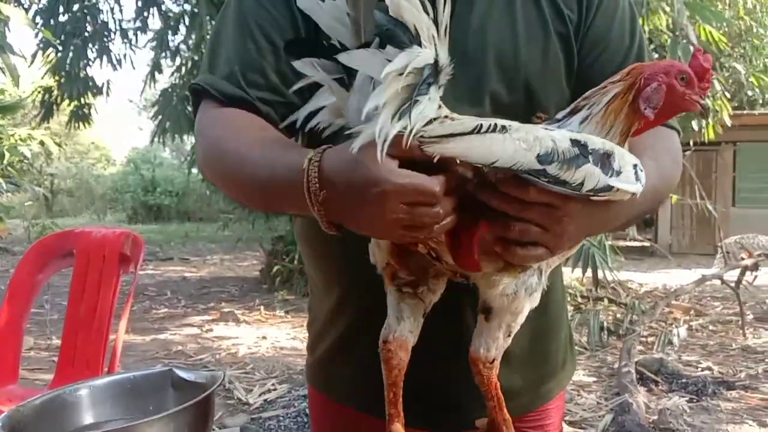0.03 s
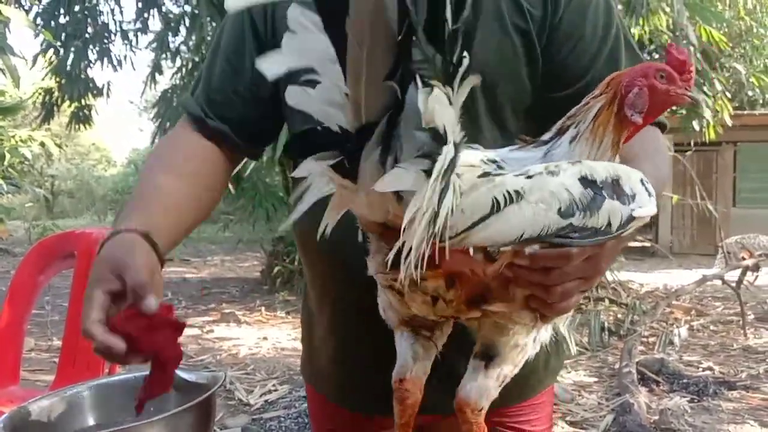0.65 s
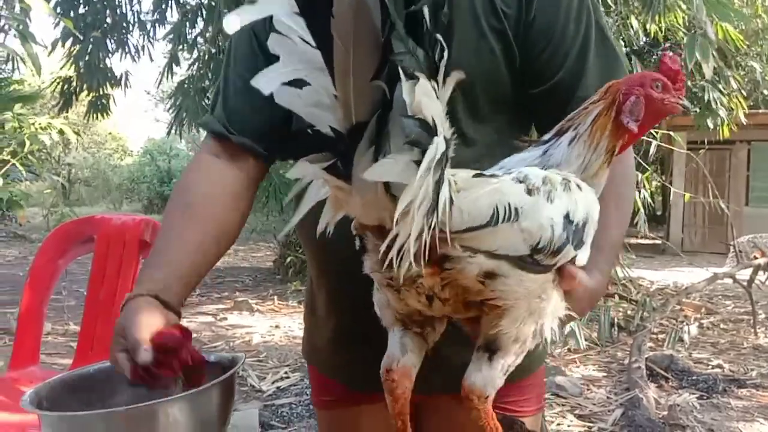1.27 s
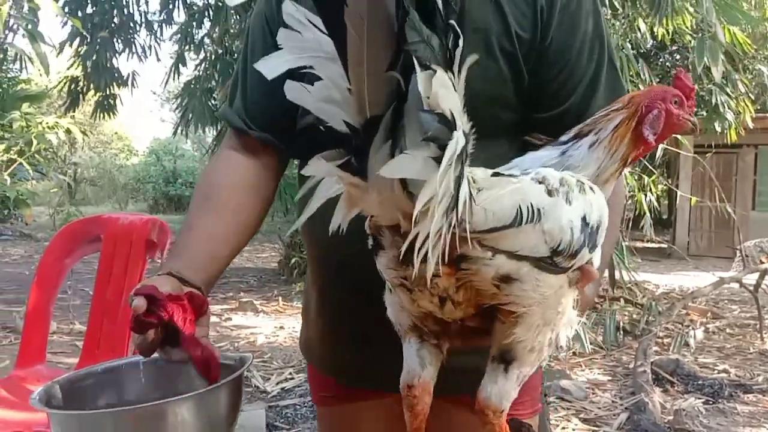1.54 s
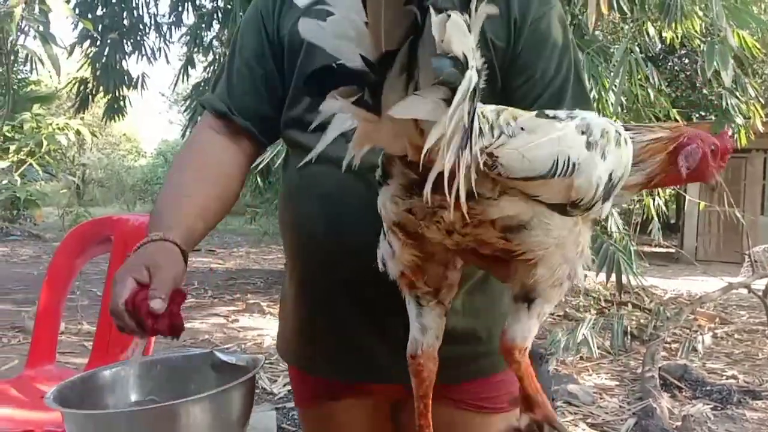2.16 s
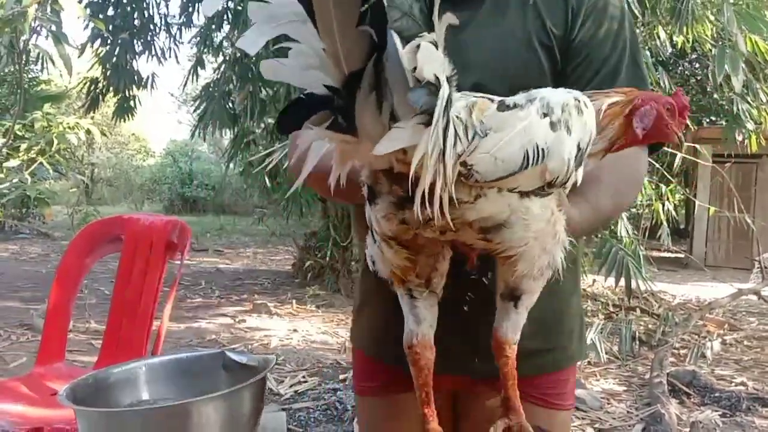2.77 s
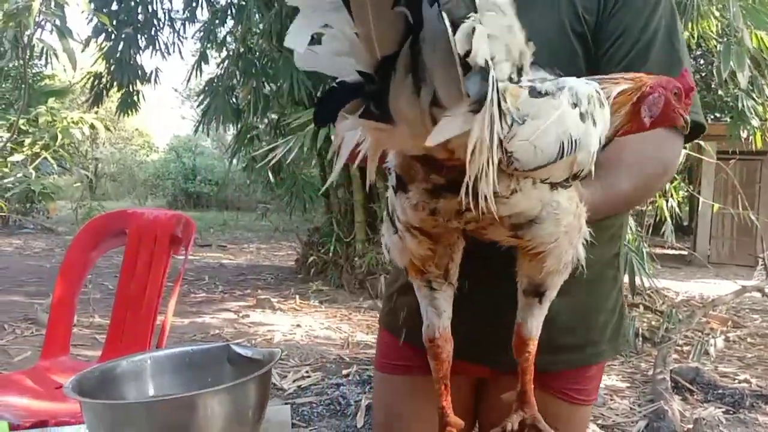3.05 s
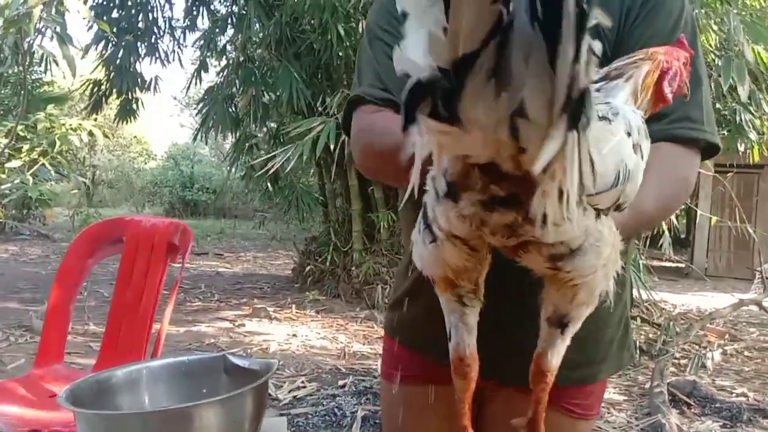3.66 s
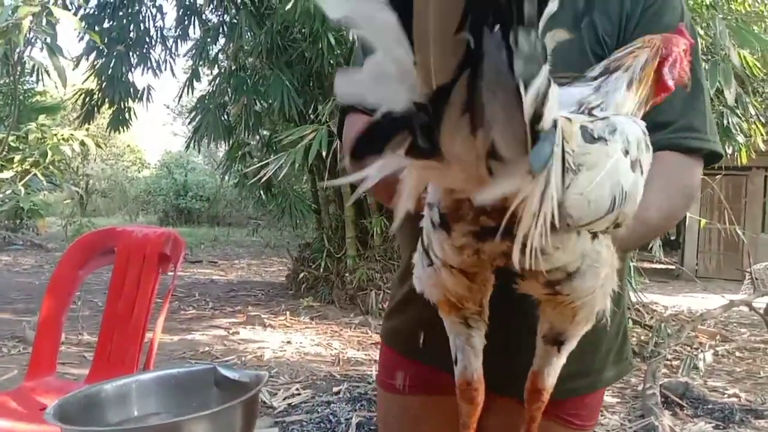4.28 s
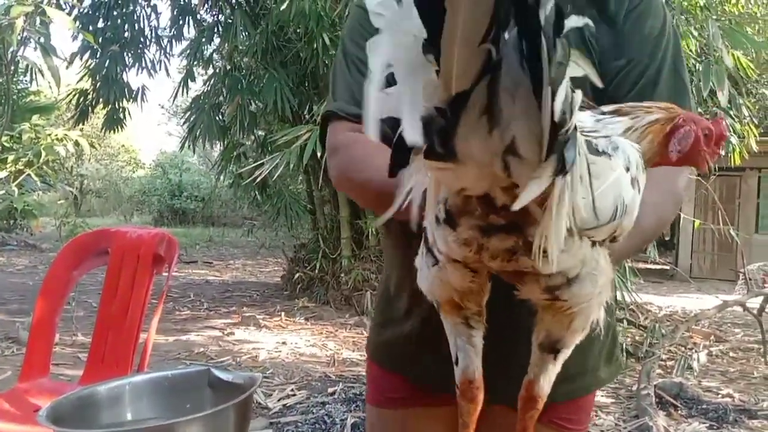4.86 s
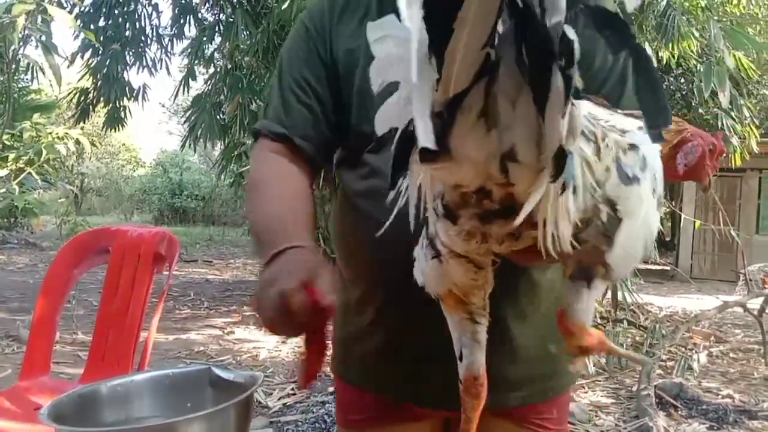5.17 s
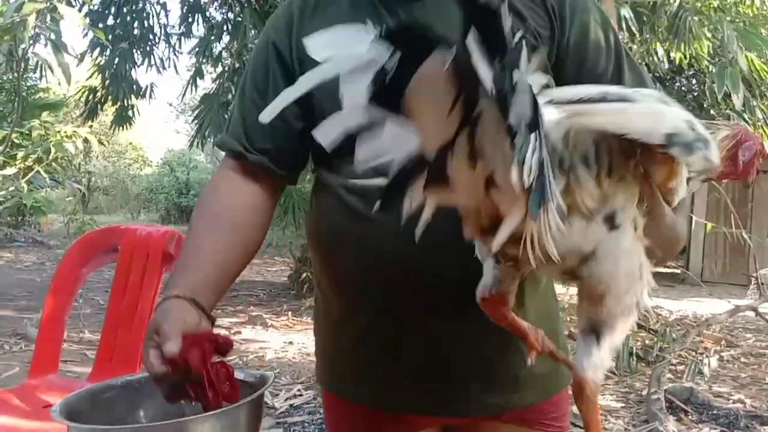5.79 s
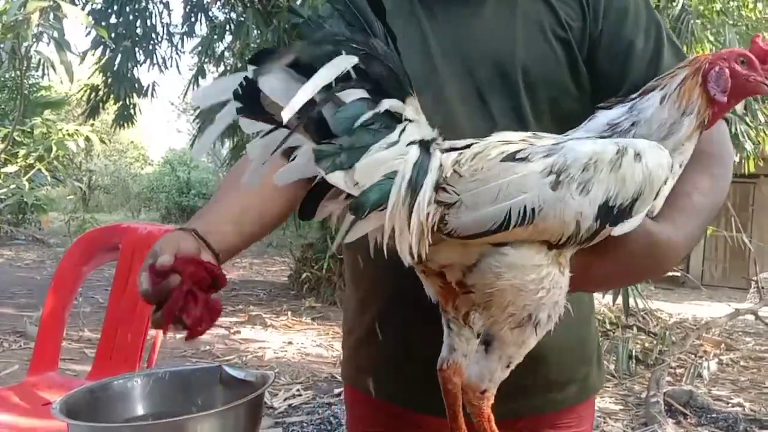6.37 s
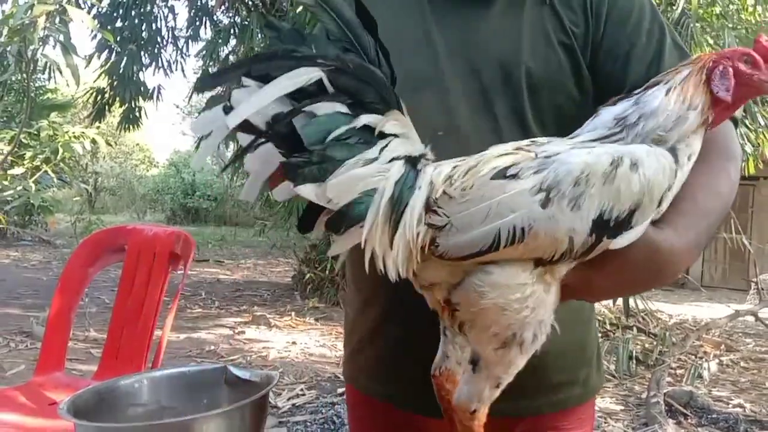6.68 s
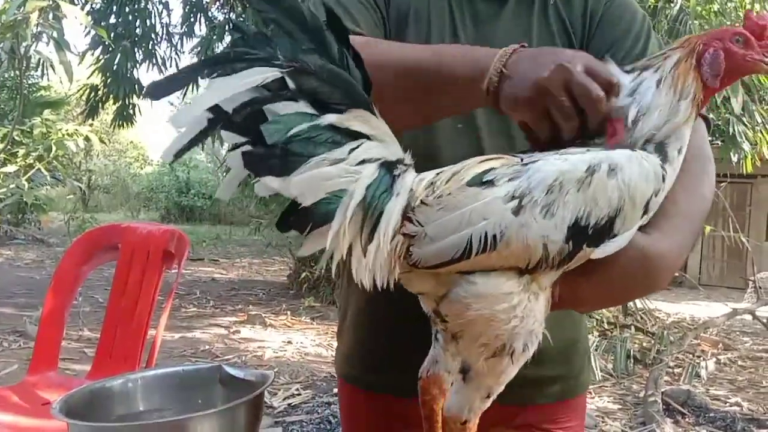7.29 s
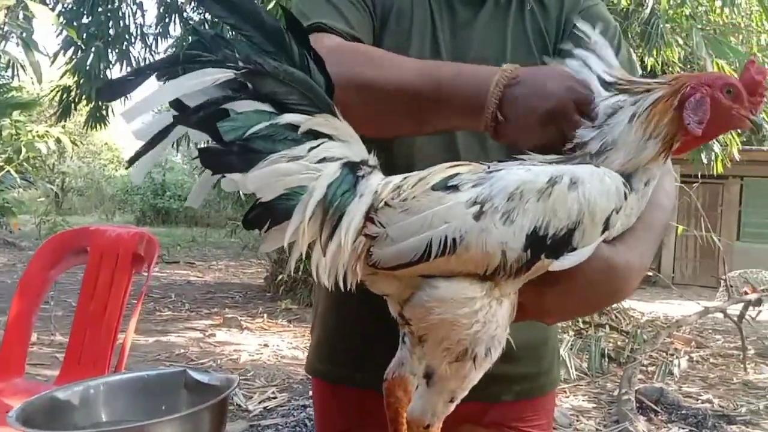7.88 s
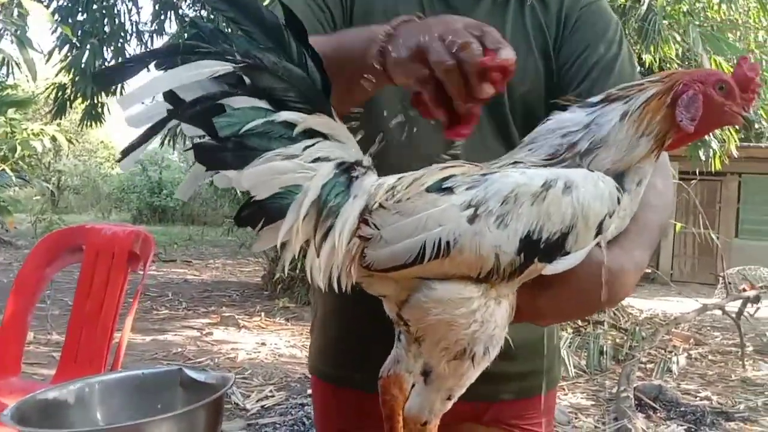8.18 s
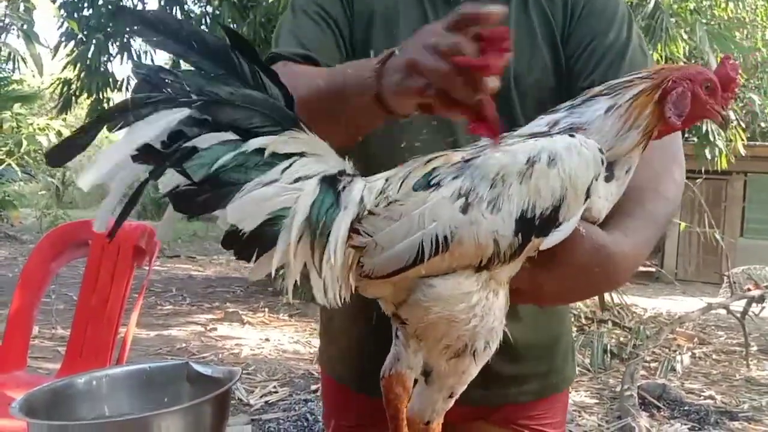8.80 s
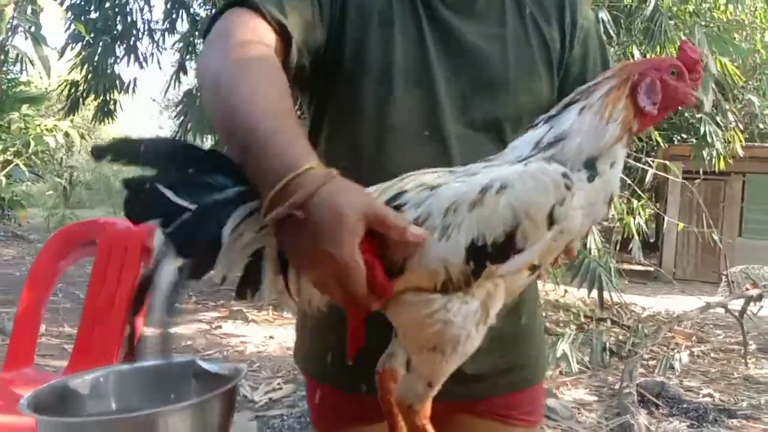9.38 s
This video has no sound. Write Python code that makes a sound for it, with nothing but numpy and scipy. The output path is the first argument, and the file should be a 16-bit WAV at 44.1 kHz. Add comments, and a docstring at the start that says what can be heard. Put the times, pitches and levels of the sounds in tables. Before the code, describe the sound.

A rooster is washed close to the microphone in a yard, clucking softly throughout over faint hiss and low rumble. Songbirds whistle in the trees, busiest in the first second and a half. From about 1 to 2.4 seconds a cloth is dipped in a steel bowl and squeezed, with small splashes, gurgles and drips. Soft wet wipes and feather brushes follow from 2.8 to 5 seconds, while two distant roosters crow faintly around 3.5 to 4.5. The loudest splashing and dripping runs from 5.2 to 6.2 seconds, with one sharp cluck near 6, and a small splash follows at 6.7. The clucks then come more often. From 7.5 seconds the cloth wipes again, and wet feathers rustle and snap, most densely around 8.3. The distant roosters crow again from 8.6, and a nearer hen gives a drawn-out moan from 9.1 until the end at about 9.5 seconds.

```python
"""A rooster is washed by hand in a yard, close to the microphone, and clucks softly all along.
A wet cloth is dunked in a steel bowl, wrung out and wiped over him: the water rings as bubbles,
splatters and drips, and his feathers snap and brush. Each cluck is a few syrinx pulses ringing his throat.
Farther off, songbirds whistle in the trees and a hen moans; in the distance another hen grumbles
and two roosters crow, over hiss, low rumble and a thin insect buzz."""
import sys
import numpy as np
from scipy import signal
from scipy.fft import rfft, irfft, next_fast_len
from scipy.io import wavfile
from scipy.ndimage import uniform_filter1d, map_coordinates

SR = 44100
rng = np.random.default_rng(int(sys.argv[2]) if len(sys.argv) > 2 else 0)


def digitize_waveform(pressure):
    """Quantize a signal to 16-bit integers and store it at the path in sys.argv[1].

    Rows of a 2-D input are taken as channels; values are limited to [-1, 1].
    """
    field = np.atleast_2d(pressure).T
    bounded = np.clip(field, -1, 1)
    quanta = np.round(bounded * 32767).astype(np.int16)
    wavfile.write(sys.argv[1], SR, quanta)


N = 420713
TIME = np.arange(N) / SR

# steady hiss of the open yard: f/Hz, relative level/dB
AIR_COLOUR = [(18, -30), (30, -13), (81, 3.5), (326, -10.5), (1450, -11.5), (1890, -24), (2520, -14),
              (3940, -32), (4860, -12), (7200, -34.5), (7780, -4.5), (9110, -19.5), (10400, 4),
              (11800, -39), (15800, -36)]
# low outdoor rumble: t/s, level/dB
RUMBLE = [(0, -83.5), (1.2, -66.5), (2.1, -69.5), (3.2, -76.5), (4.7, -83), (5.8, -72), (6.9, -80),
          (8.4, -65.5), (9.54, -63)]
# its spectrum: f/Hz, relative level/dB
RUMBLE_COLOUR = [(25, -30), (50, -1.5), (70, 8.5), (100, -1.5), (160, -23), (300, -25.5), (600, -56.5)]
# dull bumps of air on the microphone: t/s, half length/s, level/dB
BUMPS = [(.43, .05, -65.5), (4.032, 0.015, -43), (4.11, 0.06, -53), (5.91, 0.029, -59.5)]

# a distant rooster, one list a crow: t/s, pitch/Hz, level/dB
HIGH_CROWS = [
    [(3.40, 785, -85), (3.50, 740, -71.5), (3.62, 713, -73.5), (3.85, 722, -72.5), (4.10, 767, -69),
     (4.35, 799, -72.5), (4.55, 764, -88)],
    [(8.64, 727, -85), (8.75, 732, -67), (8.90, 737, -66), (9.05, 746, -63.5), (9.25, 742.5, -68.5),
     (9.42, 731, -63.5), (9.54, 732, -63)],
]
# his voice: harmonic, relative level/dB
HIGH_VOICE = [(1, 6), (2, 17.5), (3, -3), (4, -20), (5, -14)]
# a second, hoarser rooster: t/s, pitch/Hz, level/dB
LOW_CROWS = [
    [(3.70, 433, -83), (3.88, 444, -67), (4.05, 425.5, -70), (4.15, 434.3, -60.5), (4.33, 437, -70),
     (4.45, 448, -96)],
    [(8.60, 455.5, -64), (8.68, 444.8, -58.5), (8.80, 441.6, -69), (8.90, 429.6, -63.5),
     (9.02, 433.6, -60.5), (9.18, 454.3, -67), (9.32, 438, -66), (9.54, 458, -68)],
]
# his voice: harmonic, relative level/dB
LOW_VOICE = [(2, 9), (3, 6), (4, 14.5), (5, 2.5), (6, 13), (7, -40.5)]
# a distant hen's hoarse grumble: t/s, pitch/Hz, level/dB
GRUMBLES = [
    [(1.30, 291.4, -70.5), (1.38, 270, -70), (1.45, 284.4, -70), (1.51, 278.5, -60), (1.58, 266.5, -98),
     (1.64, 261, -89)],
]
# her voice: harmonic, relative level/dB
GRUMBLE_VOICE = [(1, -2), (2, 6.5), (3, -20)]
# a nearer hen's drawn-out moan: t/s, pitch/Hz, level/dB
MOANS = [
    [(9.11, 363, -83), (9.20, 411, -54), (9.29, 439, -54.5), (9.36, 444.4, -52.5), (9.42, 437.4, -47),
     (9.54, 452, -46.5)],
]
# her voice: harmonic, relative level/dB
MOAN_VOICE = [(1, 2.5), (2, -7.5), (3, -52), (4, -32)]

# a songbird's two-note call from the trees: t/s, pitch/Hz, level/dB
BIRD_CALLS = [(-.005, 3315, -58.5), (.671, 3400, -45.5), (1.89, 3470, -63), (3.87, 3670, -48),
              (5.172, 3564, -51.5), (7.611, 3705, -59)]
# its notes: delay/s, length/s, start, middle and end pitch as ratios, relative level/dB
CALL_NOTES = [(0, .07, .88, 1.0, 0.93, -2), (.04, .04, 1.03, 1.165, 1.02, 2)]
# single whistles: t/s, length/s, pitch/Hz, arch as a share of the pitch, level/dB
WHISTLES = [(0.517, 0.065, 4600, 0.13, -58), (0.864, 0.028, 2766, 0.072, -42.5),
            (0.928, 0.077, 3340, -0.03, -38), (1.028, 0.04, 2930, 0.15, -42.5),
            (1.119, 0.086, 2505, 0.00054, -49.5), (1.249, 0.049, 3040, 0.0013, -61.5),
            (1.479, 0.035, 5660, .02, -53.5), (1.733, 0.075, 5020, 0.046, -68.5),
            (2.316, 0.064, 5420, -0.01, -62), (5.04, 0.051, 4850, 0.17, -54.5),
            (7.443, 0.054, 4900, 0.073, -56.5)]
# a quick run of falling chips: t/s, pitch/Hz, level/dB
CHIPS = [(1.295, 5020, -56), (1.387, 4680, -58), (1.43, 4470, -49), (1.47, 4520, -42), (1.505, 4630, -45)]

# close, faint rustle of the wet bird being handled: t/s, level/dB
RUSTLE = [(0, -79), (1.0, -70.5), (1.8, -83), (2.5, -82.5), (3.4, -81.5), (4.15, -66), (4.6, -76),
          (5.55, -66.5), (5.9, -68.5), (6.35, -84.5), (7.25, -84.5), (7.6, -66), (7.95, -91), (8.5, -65.5),
          (9.54, -66.5)]
# its spectrum: f/Hz, relative level/dB
RUSTLE_COLOUR = [(150, 6), (500, -10.5), (1500, -2.5), (3000, 4.5), (4000, -8), (5200, 7.5), (7000, -6),
                 (10000, 4.5), (12500, -17.5), (15500, -12.5)]
# dry feathers brush past each other: t/s, half length/s, level/dB
BRUSHES = [(0.097, 0.047, -72), (3.026, 0.068, -65), (3.552, .025, -64), (7.622, .04, -71),
           (7.746, .012, -60)]
# wet feathers snap apart: t/s, level/dB, relative crack/dB
SNAPS = [(4.3047, -41.5, 1), (4.916, -45.5, 0), (4.947, -52, -11), (8.1593, -49, -9), (8.197, -47.5, -10),
         (8.2076, -43, -1), (8.225, -38, -15), (8.2397, -46, -20), (8.253, -35, -25), (8.2728, -36, -8.5),
         (8.318, -40, -21), (8.3772, -45.5, -13), (8.389, -34, -10), (8.416, -35, -30),
         (8.4448, -37.5, -35), (8.4493, -46, -28), (8.5463, -52.5, -18), (8.606, -48.5, -10),
         (8.648, -50, -24), (8.6533, -42.5, -17), (8.7611, -45, -7), (8.7835, -46.5, -24)]

# single drops fall in the bowl: t/s, level/dB, f/Hz, decay/s
DRIPS = [(1.8042, -42, 2960, 0.013), (4.1179, -45.5, 1750, 0.0013), (4.406, -56, 3030, 0.0024),
         (5.2543, -37, 2540, 0.0041), (5.3448, -25.5, 3280, 0.0016), (5.6334, -30, 3095, 0.0025),
         (5.672, -34.5, 2420, .002), (5.813, -36.5, 5300, 0.003), (5.8499, -25, 5290, 0.0079),
         (6.1864, -52.5, 4880, 0.0079), (6.2529, -42, 5480, 0.0025), (6.5842, -56.5, 5300, 0.0017),
         (6.7883, -49.5, 3000, 0.0022)]
# large air pockets gulp out of the cloth: t/s, level/dB, f/Hz
GULPS = [(1.102, -34.5, 2390), (1.104, -53, 733), (1.193, -51.5, 467), (1.2, -52.5, 236),
         (1.216, -33.5, 1707), (1.867, -42.5, 1730), (1.925, -49.5, 1900), (2.112, -38, 1874),
         (2.12, -47.5, 693), (2.186, -45, 2220), (2.205, -36, 1860), (2.241, -46.5, 1827),
         (3.058, -41, 1306), (3.091, -45, 880), (4.079, -46, 1035), (5.351, -41, 289), (5.637, -42.5, 1430),
         (5.788, -39.5, 542), (5.799, -40.5, 255.4), (5.852, -32, 1350), (5.852, -46, 408)]
# the four bubble sizes of a splash: low f/Hz, high f/Hz, rate/(1/s), cycles to fall by 60 dB
BUBBLE_SIZES = [(213.7, 1000, 370, 32), (1188, 4230, 2000, 63), (4320, 7060, 3300, 37),
                (7560, 14000, 8700, 34)]
# colour of the splashing as heard through the microphone: f/Hz, relative level/dB
SPLASH_MIC_COLOUR = [(200, 3), (900, 9.5), (1500, -1), (2200, -0.5), (3100, 4), (4000, -10), (5200, 14.5),
                     (6200, -1.5), (7300, -4), (10000, -11.5), (12500, -35), (15000, -7)]
# more water makes bigger bubbles; for each size: gain/(dB per dB of water)
WATER_FAVOURS = [1.0, 0.12, -0.28, -0.0062]
# the cloth plunges and is squeezed out: peak t/s, fall/s, level/dB, amount of water/dB
PLUNGES = [(1.102, 0.015, -53.5, 14), (1.217, 0.01, -53, 7), (1.923, .014, -60.5, 14),
           (2.099, 0.045, -49.5, -9), (2.119, 0.036, -46, -4.5), (2.189, 0.028, -47, -2.5),
           (5.256, 0.019, -47, -2.5), (5.354, 0.024, -47, 6), (5.408, 0.013, -43, 3),
           (5.427, .032, -42, -9), (5.503, 0.012, -47.5, -13), (5.636, 0.0045, -34, -6.5),
           (5.678, 0.03, -47, 4), (5.714, 0.0059, -40, 3.5), (5.774, 0.029, -43, 3),
           (5.828, 0.015, -34, -7), (5.854, 0.012, -32, -7.5), (5.981, 0.01, -47.5, 6),
           (6.421, 0.014, -70.5, -21), (6.663, 0.017, -47, 10.5), (6.697, 0.0033, -49.5, 6)]
# water runs off the lifted cloth in fine drops: peak t/s, fall/s, level/dB
RUNOFFS = [(0.768, 0.11, -60.5), (1.863, 0.046, -53), (2.053, 0.063, -57), (2.369, 0.032, -55.5),
           (5.905, .033, -38.5), (6.09, 0.035, -53.5), (6.171, 0.06, -59)]
# wipes of the cloth over the feathers; the row at 9.178 s is a low, soft, watery slosh: # peak t/s, fall/s,
# level/dB, amount of water/dB
WIPES = [(0.122, 0.078, -69.5, -5.5), (0.391, 0.013, -60, 6.5), (2.783, 0.024, -70, -1),
         (2.867, 0.015, -56.5, -0.5), (3.054, 0.07, -56.5, -3.5), (3.161, 0.0065, -58, -5),
         (3.573, 0.036, -60, -5), (3.655, 0.028, -54, 3.5), (4.068, 0.023, -58.5, 5),
         (4.125, .01, -54.5, -4), (4.206, 0.015, -59.5, 4), (4.702, 0.026, -72.5, 12),
         (4.823, 0.015, -56.5, -24), (4.948, 0.066, -67, -11), (7.566, 0.093, -65, 9.5),
         (7.753, 0.015, -65.5, 8.5), (8.213, 0.023, -64, -8), (8.26, 0.066, -56, 5.5),
         (8.416, 0.11, -56.5, 1), (8.496, 0.035, -61, 4), (8.678, 0.06, -60.5, -10),
         (8.78, 0.078, -59.5, -1.5), (9.178, 0.047, -69, 27), (9.429, 0.045, -62, 6),
         (9.514, 0.053, -63, 12.5)]

# the close rooster's soft clucks, beak shut: t/s, level/dB, pitch/Hz
SOFT_CLUCKS = [(1.934, -54.5, 284), (6.08, -47.5, 468), (6.161, -58, 336), (6.225, -48, 479),
               (6.289, -48.5, 214.2), (6.495, -53, 301), (6.597, -52.5, 310.4), (6.818, -44.5, 216),
               (6.943, -52.5, 193), (7.093, -45, 202.5), (7.33, -48, 297), (7.654, -44.5, 299),
               (7.805, -49, 285), (8.182, -44, 205.4), (8.35, -46, 187.3), (8.488, -45.5, 192.3),
               (8.689, -42, 284), (9.139, -48.5, 407), (9.332, -52.5, 273)]
# his short clucks, beak open: t/s, level/dB, pitch/Hz, throat f/Hz, beak opening/dB
OPEN_CLUCKS = [(.866, -39, 288, 322, 5.5), (.883, -47.5, 314, 1080, 4.5), (1.786, -48, 396, 700, 3),
               (1.815, -51, 412, 800, 4), (2.695, -46, 390, 560, 0), (2.719, -49, 400, 760, 0),
               (2.872, -51.5, 402, 770, -21), (3.658, -49.5, 261, 770, -24), (3.938, -44, 296, 287, -5),
               (4.596, -56.5, 460, 525, 3), (4.787, -41.5, 529, 550, 8), (5.952, -26, 408.5, 550, 9),
               (6.404, -50, 286, 508, -2.5), (7.184, -48, 323, 649, -8.5), (7.212, -46.5, 386, 677, 21),
               (7.361, -51, 307, 618, 3), (7.382, -35.5, 285, 620, 9.5)]


def from_db(db):
    """Decibels to gain."""
    return 10 ** (np.asarray(db) / 20)


def rms_one(x):
    """Scale to an rms of 1."""
    return x / np.sqrt(np.mean(x ** 2) + 1e-20)


def add(out, start_s, sound):
    """Mix a short sound in at a given time."""
    i = int(np.clip(round(start_s * SR), 0, N - 1))
    out[i:i + len(sound)] += sound[:N - i]


def at_hz(points, hz):
    """Read a spectrum table on a log-frequency axis."""
    f, db = np.transpose(points)
    return np.interp(np.log(np.maximum(hz, 1)), np.log(f), db)


def coloured(x, spectrum):
    """Give a steady noise a spectrum; rms 1."""
    size = next_fast_len(len(x))
    gain = from_db(at_hz(spectrum, np.fft.rfftfreq(size, 1 / SR)))
    return rms_one(irfft(rfft(x, size) * gain, size)[:len(x)])


def band(x, low_hz, high_hz, order=2):
    """Butterworth band-pass."""
    sos = signal.butter(order, [low_hz, min(high_hz, .45 * SR)], "band", fs=SR, output="sos")
    return signal.sosfilt(sos, x)


def drift(per_s, size):
    """A random wander with a spread of about 1."""
    knots = rng.standard_normal(int(size * per_s / SR) + 2)
    return np.interp(np.arange(size) * per_s / SR, np.arange(len(knots)), knots)


def swells(events):
    """A gain curve with one bell-shaped swell for each event."""
    return sum(from_db(db) * np.exp(-((TIME - s) / half) ** 2) for s, half, db in events)


def impacts(per_s, spread_db):
    """Random clicks: many small, a few large."""
    sizes = from_db(spread_db * np.minimum(rng.exponential(1, N), 3.5)) * rng.choice([-1, 1], N)
    return sizes * (rng.random(N) < per_s / SR)


def patchy(x, depth_db=7.0, patch_hz=323.1, patch_s=.025):
    """Folds and cavities open and close, so narrow resonances come and go all over the spectrum."""
    f, t, spectra = signal.stft(x, SR, nperseg=512)
    field = rng.standard_normal((200, 1200))
    where = np.meshgrid(f / patch_hz, t / patch_s, indexing="ij")
    patches = np.clip(map_coordinates(field, where, order=1, mode="wrap"), -2, 1.2)
    return signal.istft(spectra * rms_one(from_db(depth_db * patches)), SR)[1][:N]


def yard(x, wet_db, t60, top_hz):
    """Echoes from ground, walls and trees reach the microphone after the direct sound."""
    t = TIME[:SR]
    tail = band(rng.standard_normal(SR), 180, top_hz, order=1) * from_db(-60 * t / t60) * (t > .004)
    echoes = signal.fftconvolve(x, tail / np.sqrt(np.sum(tail ** 2)))[:N]
    return (x + from_db(wet_db) * echoes) / np.sqrt(1 + from_db(wet_db) ** 2)


def outdoor_air():
    """The yard's steady hiss and uneven rumble, with a few bumps of air on the microphone."""
    hiss = from_db(-76.5) * coloured(rng.standard_normal(N), AIR_COLOUR)
    rumble_db = np.interp(TIME, *np.transpose(RUMBLE)) - 0.5 + 2.5 * drift(16, N)
    rumble = from_db(rumble_db) * coloured(rng.standard_normal(N), RUMBLE_COLOUR)
    bumps = swells(BUMPS) * rms_one(band(rng.standard_normal(N), 80, 125.6))
    return hiss + rumble + bumps


def insect(hz=4880, width=0.0086):
    """A thin, far buzz that slowly comes and goes."""
    buzz = band(rng.standard_normal(N), hz * (1 - width), hz * (1 + width))
    return from_db(-88 + 2.0 * drift(0.77, N)) * rms_one(buzz)


def fowl(calls, voice, rough, flutter_db=3.0):
    """Long calls from across the yard: harmonics on a pitch that shakes with hoarseness."""
    out = np.zeros(N)
    for call in calls:
        s, hz, db = np.transpose(call)
        t = np.arange(s[0], s[-1], 1 / SR)
        pitch = np.interp(t, s, hz) * (1 + rough * drift(220, len(t)))
        phase = 2 * np.pi * np.cumsum(pitch) / SR
        tone = rms_one(sum(from_db(level) * np.sin(round(k) * phase) for k, level in voice))
        edges = np.clip(np.minimum(t - t[0], t[-1] - t) / 0.0096, 0, 1)
        add(out, s[0], tone * edges * from_db(np.interp(t, s, db) + flutter_db * drift(49.35, len(t))))
    return out


def whistle(length_s, hz, shape, db):
    """A note arching through three pitches; fainter ones come through more leaves and are more blurred."""
    u = np.linspace(0, 1, int(length_s * SR))
    blur = np.interp(db, [-56, -43], [.055, .011])
    arch = np.polyval(np.polyfit([0, .5, 1], shape, 2), u)
    pitch = hz * arch * (1 + blur * drift(600, len(u)))
    swell = np.abs(np.sin(np.pi * u)) ** 0.49 * from_db(db + 2.0 * drift(150, len(u)))
    return np.sqrt(2) * swell * np.sin(2 * np.pi * np.cumsum(pitch) / SR)


def songbirds():
    """Up in the trees a two-note call keeps returning, between single whistles and a run of chips."""
    out = np.zeros(N)
    for s, hz, db in BIRD_CALLS:
        for delay, length, *shape, note_db in CALL_NOTES:
            add(out, s + delay, whistle(length, hz, shape, db + note_db))
    for s, length, hz, arch, db in WHISTLES:
        add(out, s, whistle(length, hz, [1 - arch, 1, 1 - arch], db))
    for s, hz, db in CHIPS:
        add(out, s, whistle(length_s=0.0245, hz=hz, shape=[1.13, 1.0, .96], db=db))
    return out


def feather_rustle():
    """Wet feathers crackle faintly under the hand."""
    crackle = coloured(impacts(per_s=2200, spread_db=5.0), RUSTLE_COLOUR)
    return patchy(from_db(np.interp(TIME, *np.transpose(RUSTLE))) * crackle)


def feather_brushes():
    """Dry barbs tick densely: a crisp hiss high above the water sounds."""
    ticks = impacts(per_s=6000, spread_db=8.0)
    return swells(BRUSHES) * rms_one(band(ticks, 11000, .45 * SR))


def drop(db, hz, decay_s, crack_db, spatter_db, rise=0.07):
    """A drop is a sharp crack, a short rising bubble ring and a little spatter around its pitch."""
    t = TIME[:1500]
    noise, fade = rng.standard_normal((2, len(t))), np.exp(-t / decay_s)
    phase = 2 * np.pi * hz * np.cumsum(1 + rise * (.5 - fade)) / SR
    bubble = rms_one(np.sin(phase) * fade * (1 - np.exp(-t / .00025)))
    spatter = rms_one(band(noise[0] * fade, hz * 0.49, hz * 1.44, order=4))
    crack = rms_one(band(noise[1] * fade ** 2, 7500, 13000))
    return from_db(db - 7.5) * rms_one(bubble + from_db(spatter_db) * spatter + from_db(crack_db) * crack)


def feather_snaps():
    """Wet feathers snap apart like very short drops, all near one pitch."""
    out = np.zeros(N)
    for s, db, crack_db in SNAPS:
        hz = 5300 * (1 + 0.068 * rng.standard_normal())
        add(out, s, drop(db, hz, decay_s=.0012, crack_db=crack_db, spatter_db=-3.5))
    return out


def drips():
    """Drops fall in the bowl: harder ones crack more, long-ringing ones land softly."""
    out = np.zeros(N)
    for s, db, hz, decay_s in DRIPS:
        crack_db = -20 + .6 * (db + 39) - 1501 * decay_s
        add(out, s, drop(db, hz, decay_s, crack_db, spatter_db=-8.5))
    return out


def gulps(rise=0.12):
    """A big bubble rings for some milliseconds, its pitch climbing as it nears the surface."""
    out, t = np.zeros(N), TIME[:4400]
    for s, db, hz in GULPS:
        decay_s = .0105 * (1000 / hz) ** 0.37   # bigger, lower bubbles ring longer
        fade = np.exp(-t / decay_s)
        phase = 2 * np.pi * hz * np.cumsum(1 + rise * (.6 - fade)) / SR
        add(out, s, from_db(db) * np.sin(phase) * fade * (1 - np.exp(-t / 0.0006)))
    return out


def ring(clicks, hz, t60):
    """A click sets a decaying sine ringing."""
    r, w = from_db(-60 / (t60 * SR)), 2 * np.pi * min(hz, .45 * SR) / SR
    return signal.lfilter([0, np.sin(w)], [1, -2 * r * np.cos(w), r * r], clicks + 1e-18)


def bubbles(low_hz, high_hz, per_s, cycles, count=16):
    """An even flow of droplets, each ringing a tiny bubble at one of several pitches."""
    clicks, dealt = impacts(per_s, spread_db=3.0), rng.integers(0, count, N)
    pitches = low_hz * (high_hz / low_hz) ** ((np.arange(count) + .5) / count)
    rings = sum(hz * from_db(at_hz(SPLASH_MIC_COLOUR, hz)) * ring(clicks * (dealt == k), hz, cycles / hz)
                for k, hz in enumerate(pitches))
    rings = rms_one(band(rings, low_hz * 0.67, high_hz * 1.04, order=4))
    return rings / np.sqrt(uniform_filter1d(rings ** 2, size=1100) + 0.028)   # evens the level


def burst(peak_s, rise_s, fall_s, db, weight_db, mix_db):
    """One swell and decay: its start and the power in each band; weight favours the low end."""
    start_s = max(peak_s - 3 * rise_s, 0)
    t = np.arange(start_s, peak_s + 7 * fall_s, 1 / SR) - peak_s
    swell = np.exp(-(np.minimum(t, 0) / rise_s) ** 2 - np.maximum(t, 0) / fall_s)
    gains = from_db(db + np.array(mix_db) + weight_db * np.array(WATER_FAVOURS))
    return start_s, (gains[:, None] * swell) ** 2


def splashes(plunge_rise_s=0.0087, runoff_rise_s=0.0051, usual_plunge_db=-45):
    """Plunges, run-off and wipes each mix four bubble sizes; one wipe is a low, soft slosh."""
    bursts = []
    for s, fall, db, water_db in PLUNGES:
        fizz_db = (db - usual_plunge_db) * np.array([0.11, -.05, .05, 0.25])   # harder ones fizz more
        mix_db = np.array([-12, 0.5, -1.5, -9.5]) + fizz_db
        bursts.append(burst(s, plunge_rise_s, fall, db, water_db, mix_db))
    for s, fall, db in RUNOFFS:
        bursts.append(burst(s, runoff_rise_s, fall, db, weight_db=0, mix_db=[-27, -11, 1.5, -15]))
    for s, fall, db, weight_db in WIPES:
        bursts.append(burst(s, 0.91 * fall, fall, db, weight_db, mix_db=[-12.5, 1.5, -0.5, -8.0]))
    power = np.zeros((len(BUBBLE_SIZES), N))
    for start_s, parts in bursts:
        for total, part in zip(power, parts):
            add(total, start_s, part)
    return patchy(sum(np.sqrt(p) * bubbles(*size) for p, size in zip(power, BUBBLE_SIZES)))


def cluck(pitch_hz, throat_hz, beak_db, half_s, glide, jitter=0.051, lean=0.19):
    """A few syrinx pulses ring the throat, centred in a tenth of a second; an open beak widens the band."""
    t = TIME[:4410] - .05
    pitch = pitch_hz * (1 + glide * np.tanh(t / (2 * half_s)) + jitter * drift(291.6, len(t)))
    phase = 2 * np.pi * np.cumsum(pitch) / SR
    phase -= phase[len(t) // 2]
    pulses = sum(np.cos(k * phase) for k in range(1, 14))
    pulses += 2.2 * rng.standard_normal(len(t))   # throaty air between the pulses
    pulses *= from_db(2.5 * drift(250, len(t)))
    pulses /= np.cosh(1.2 * t / half_s * (1 - lean * np.sign(t)))   # quick start, slower end
    throat = rms_one(band(pulses, throat_hz * 0.81, throat_hz * 1.124))
    chest = rms_one(band(pulses, 245, 335))
    bright = rms_one(band(pulses, 1600, 1970, order=4))
    open_beak = rms_one(band(pulses, 235, 1200, order=4)) + from_db(-21) * bright + from_db(-8) * chest
    voice = throat + from_db(-20.5) * chest + from_db(beak_db) * open_beak
    return voice / np.sqrt(uniform_filter1d(voice ** 2, size=220).max())


def rooster_clucks(lead_s=.051):
    """The rooster at the microphone: soft clucks sag in pitch, open-beaked ones are shorter and rise."""
    out = np.zeros(N)
    for s, db, pitch_hz in SOFT_CLUCKS:
        soft = cluck(pitch_hz, throat_hz=628, beak_db=-36.5, half_s=0.0079, glide=-0.129)
        add(out, s - lead_s, from_db(db) * soft)
    for s, db, pitch_hz, throat_hz, beak_db in OPEN_CLUCKS:
        add(out, s - lead_s, from_db(db) * cluck(pitch_hz, throat_hz, beak_db, half_s=0.0047, glide=0.1))
    return out


def scene():
    """One microphone close to bowl and rooster; the far birds arrive with more of the yard's echo."""
    washing = yard(splashes() + drips() + feather_snaps() + gulps(), wet_db=-14.0, t60=0.13, top_hz=6300)
    rooster = yard(rooster_clucks(), wet_db=-13.5, t60=0.13, top_hz=4020)
    trees = yard(songbirds(), wet_db=-7.0, t60=.33, top_hz=8000)
    crows = fowl(HIGH_CROWS, HIGH_VOICE, rough=.03) + fowl(LOW_CROWS, LOW_VOICE, rough=.04)
    grumble = fowl(GRUMBLES, GRUMBLE_VOICE, rough=.14, flutter_db=3.5)
    far_fowl = yard(crows + grumble, wet_db=3.0, t60=.35, top_hz=4000)
    hen = yard(fowl(MOANS, MOAN_VOICE, rough=0.026), wet_db=-14.0, t60=0.19, top_hz=3000)
    background = outdoor_air() + insect() + far_fowl + hen + trees
    return (background + feather_rustle() + feather_brushes() + washing + rooster)[None]


def record(dry):
    """The microphone signal is cut steeply above 15.9 kHz."""
    return signal.sosfilt(signal.ellip(10, .2, 70, 15900, fs=SR, output="sos"), dry)


dry = scene()
out = record(dry)
digitize_waveform(out)
```